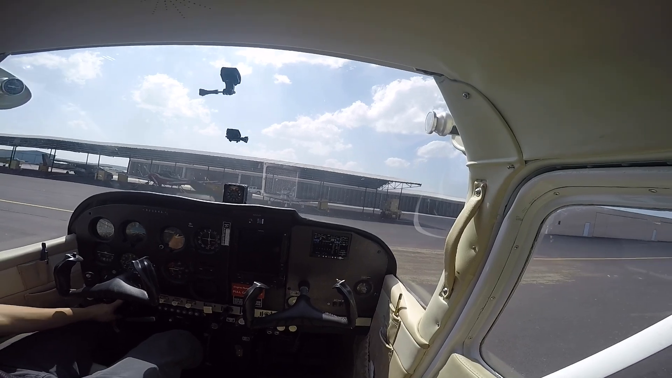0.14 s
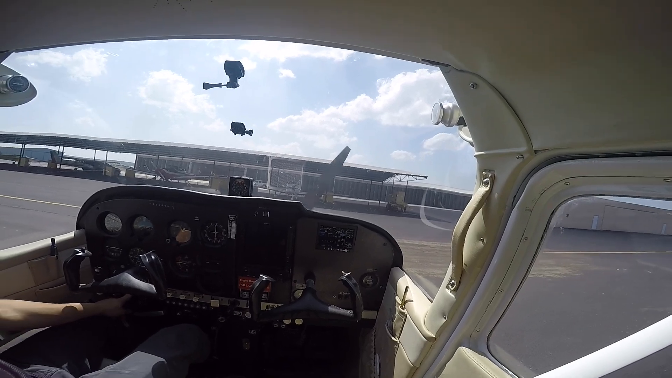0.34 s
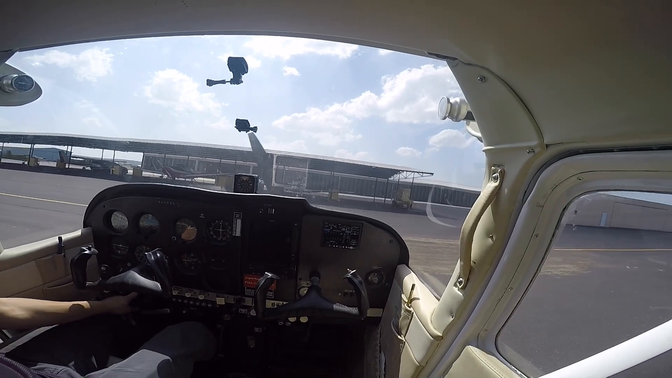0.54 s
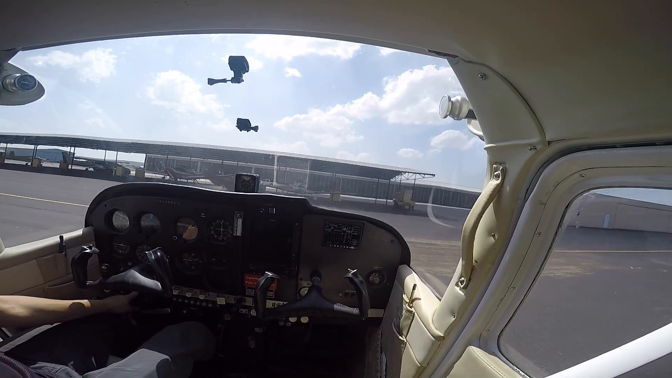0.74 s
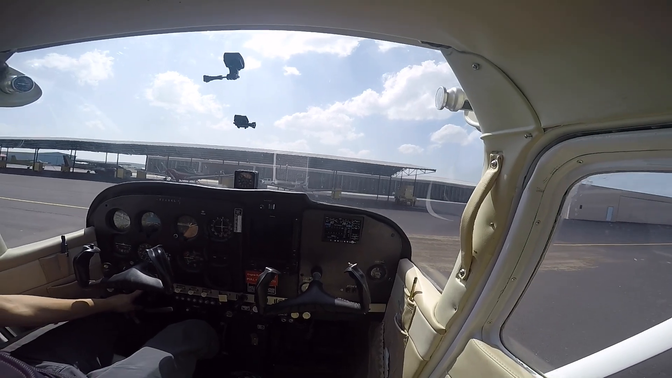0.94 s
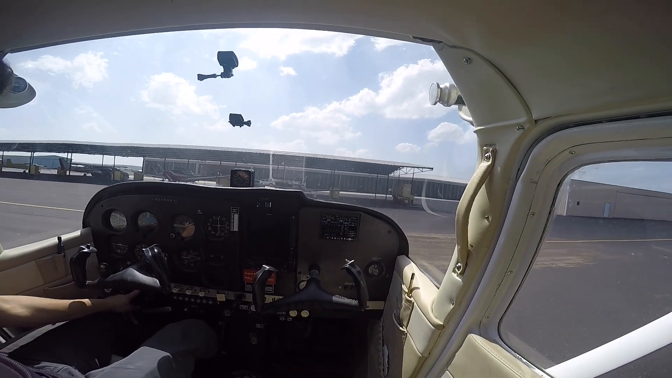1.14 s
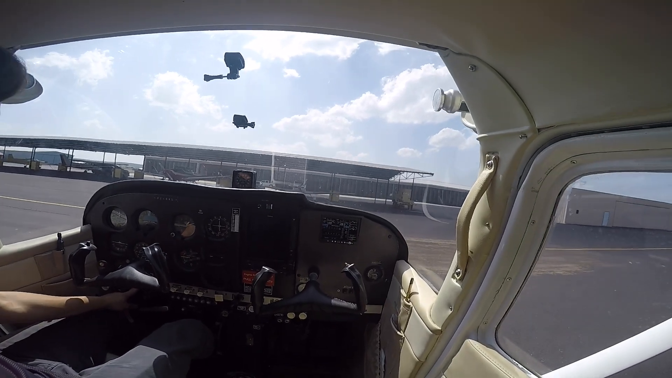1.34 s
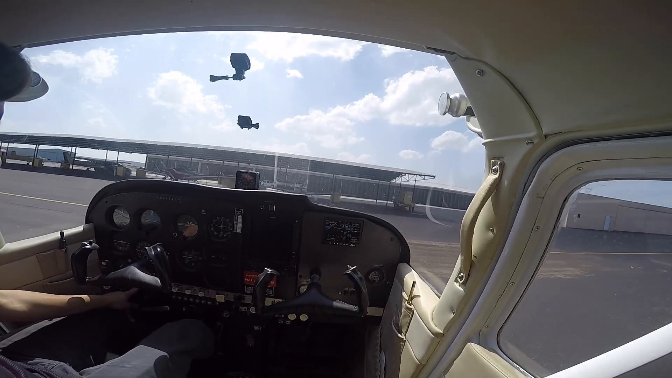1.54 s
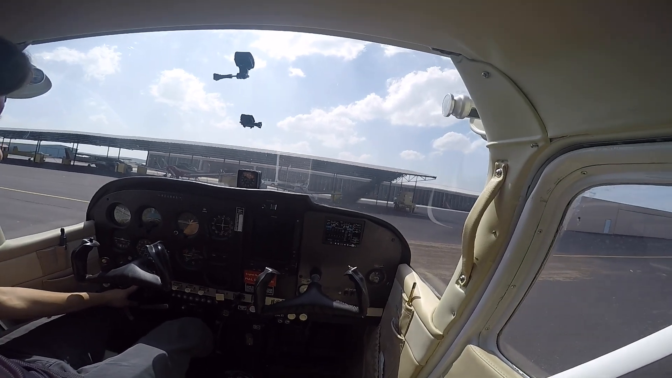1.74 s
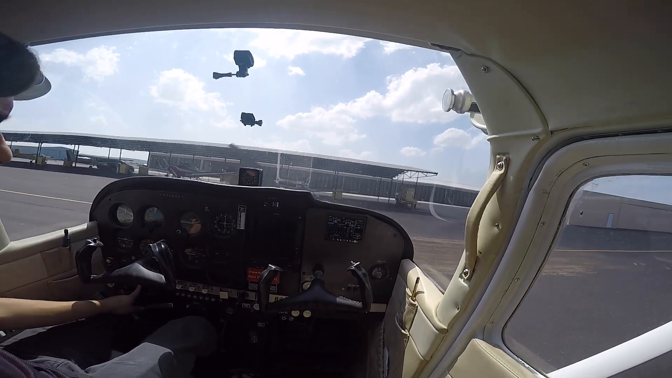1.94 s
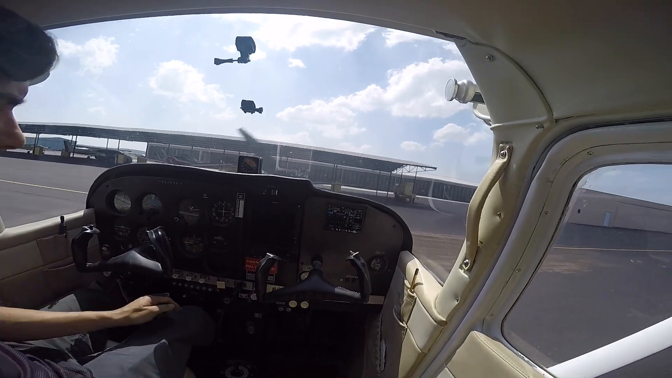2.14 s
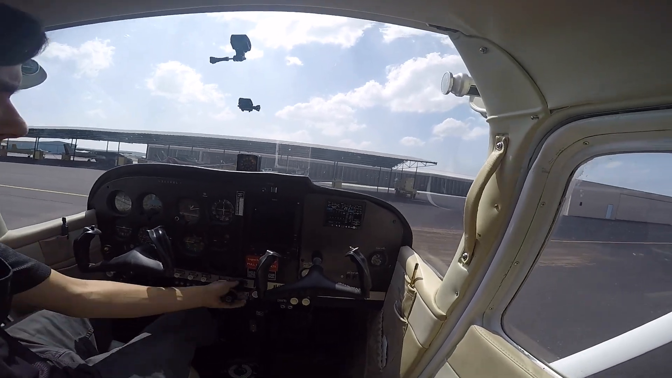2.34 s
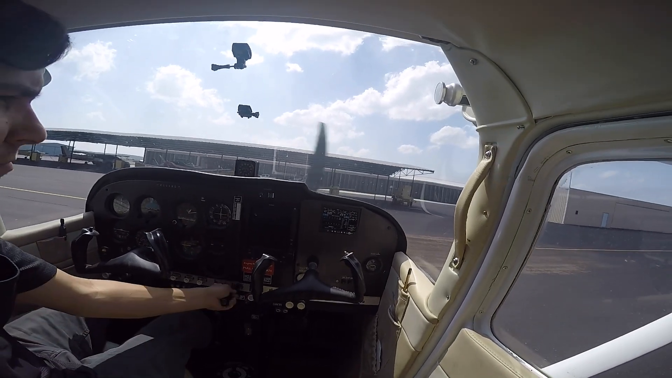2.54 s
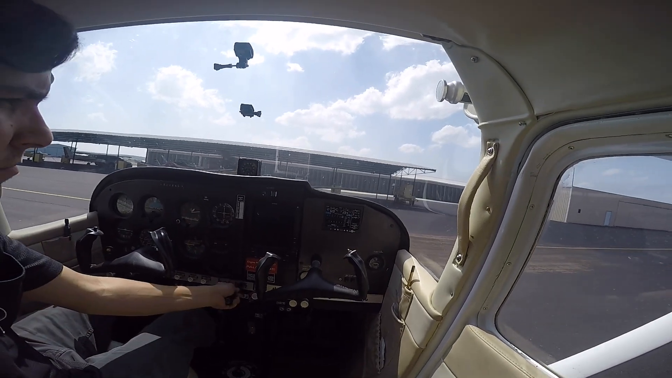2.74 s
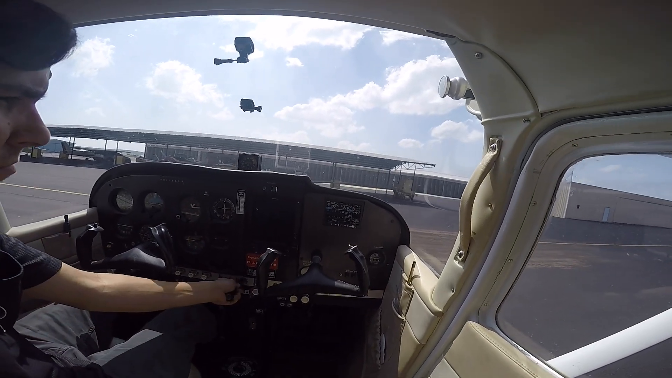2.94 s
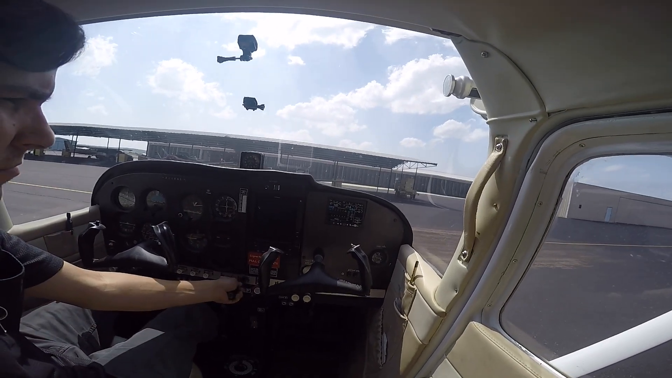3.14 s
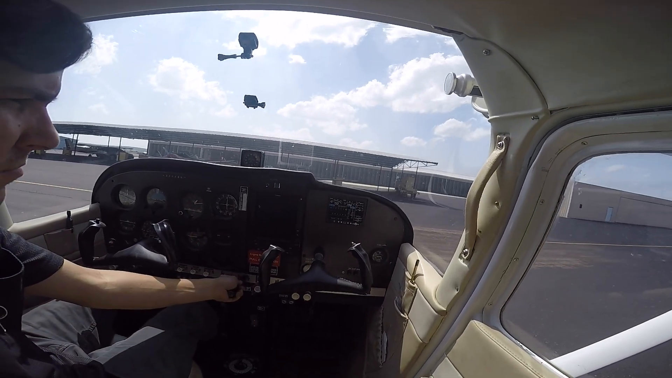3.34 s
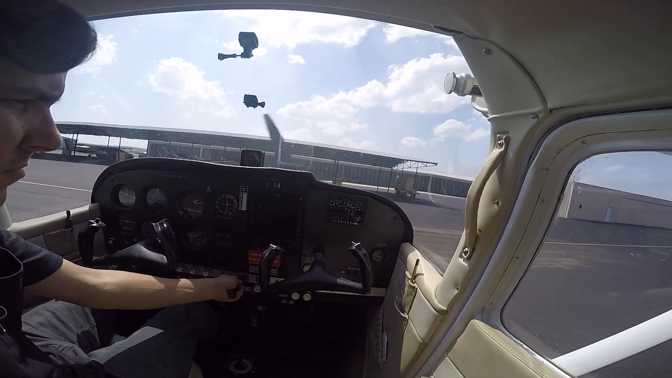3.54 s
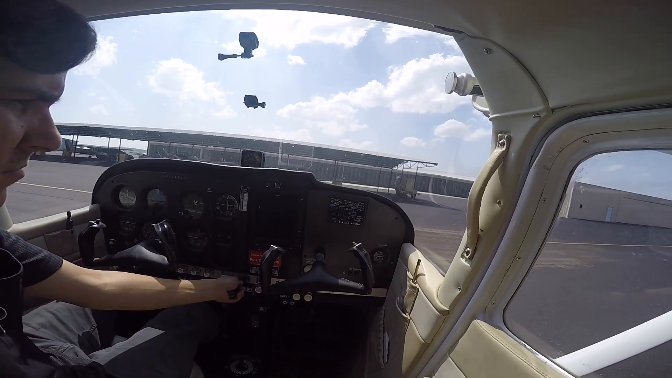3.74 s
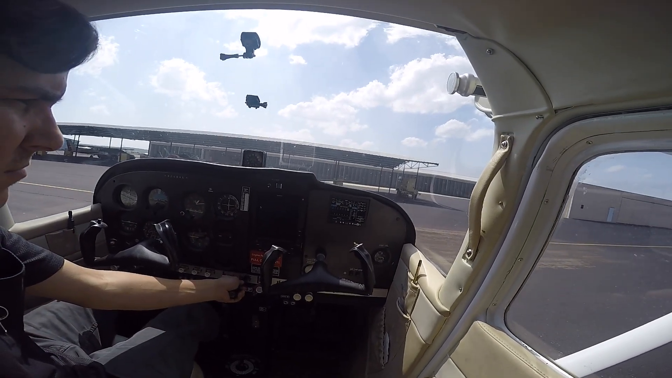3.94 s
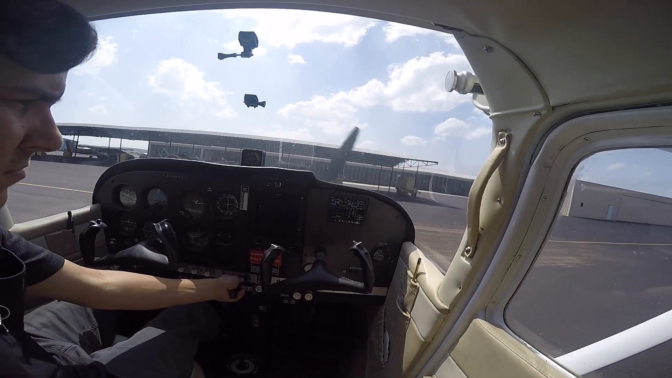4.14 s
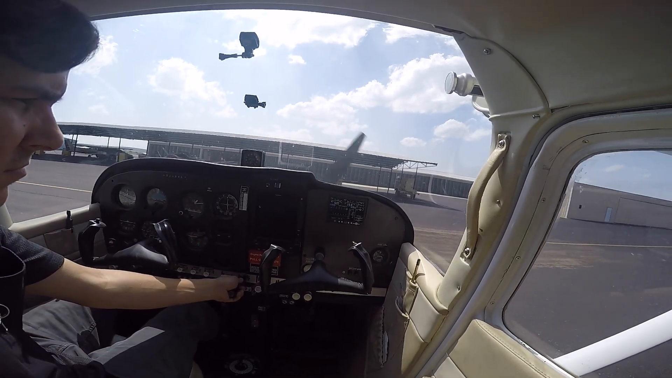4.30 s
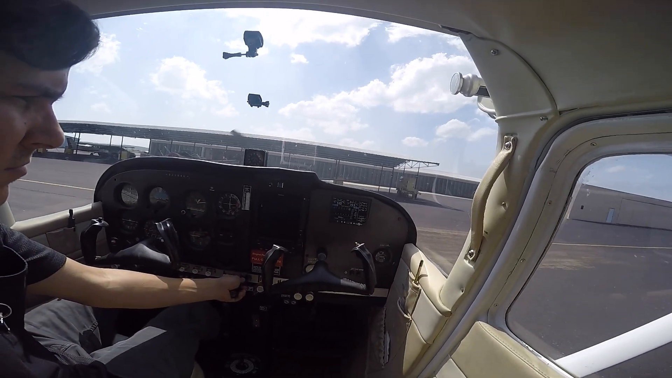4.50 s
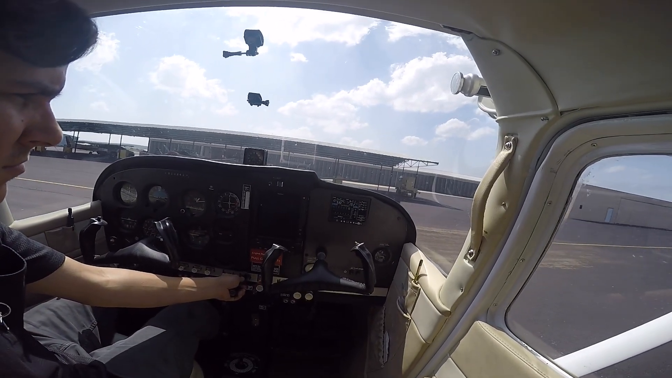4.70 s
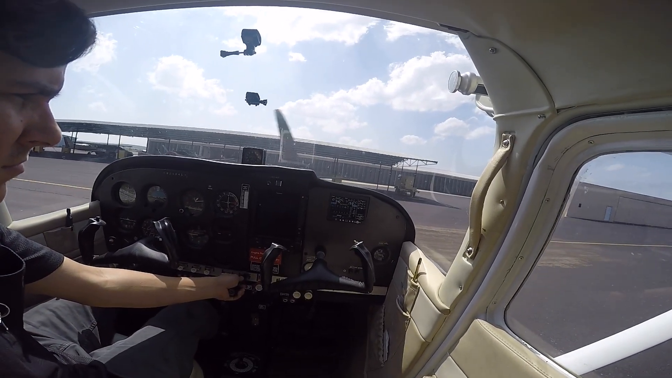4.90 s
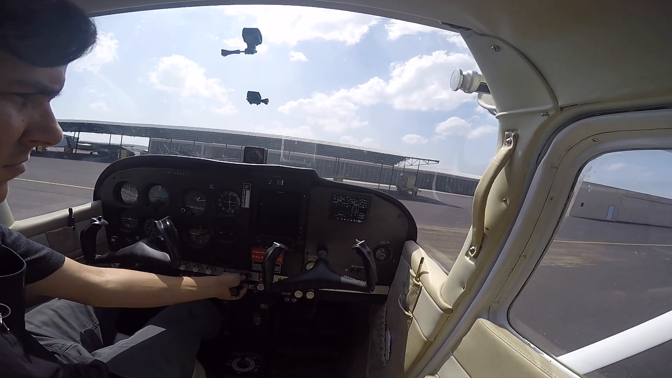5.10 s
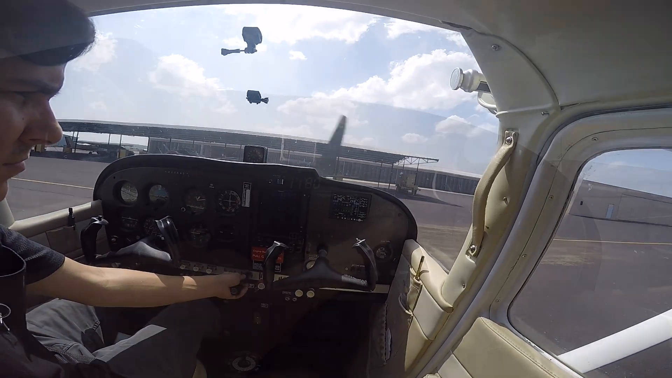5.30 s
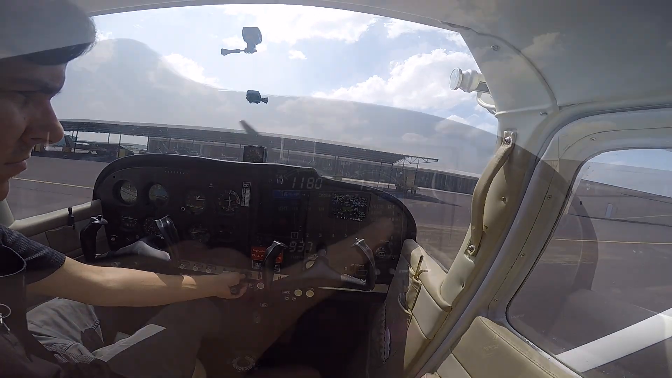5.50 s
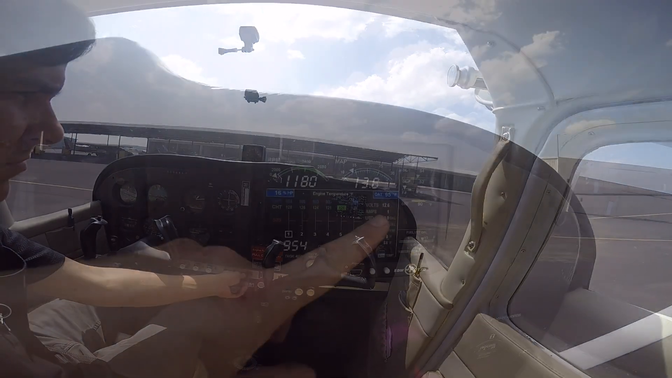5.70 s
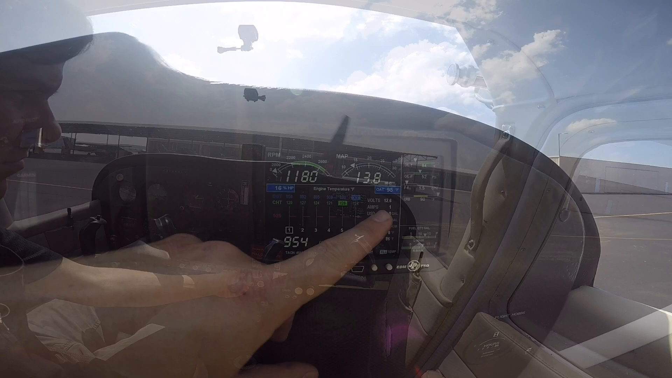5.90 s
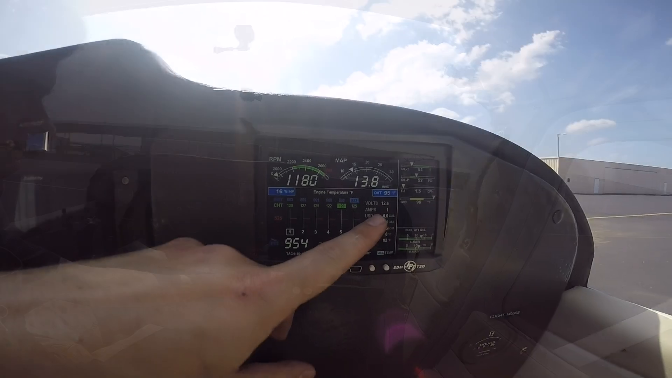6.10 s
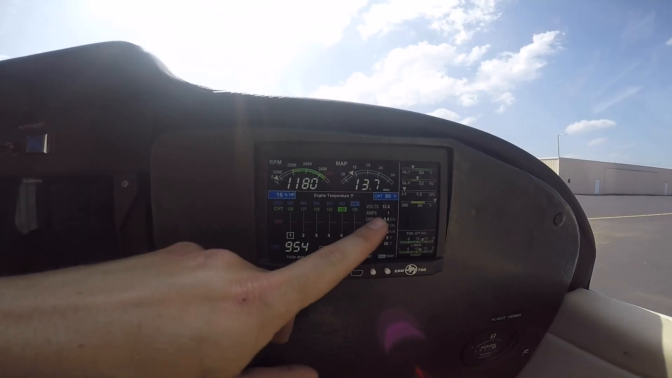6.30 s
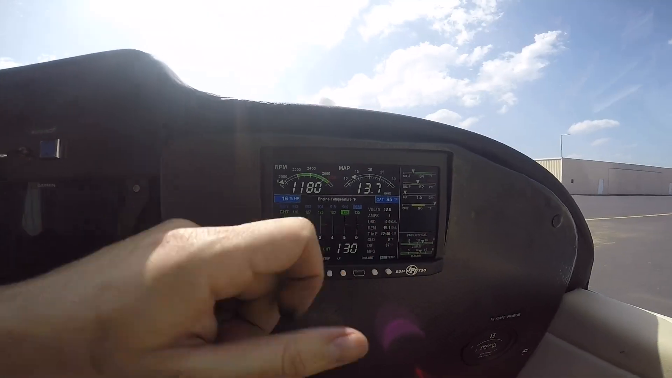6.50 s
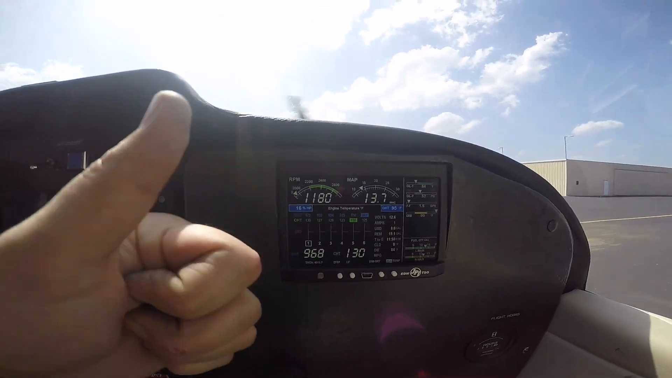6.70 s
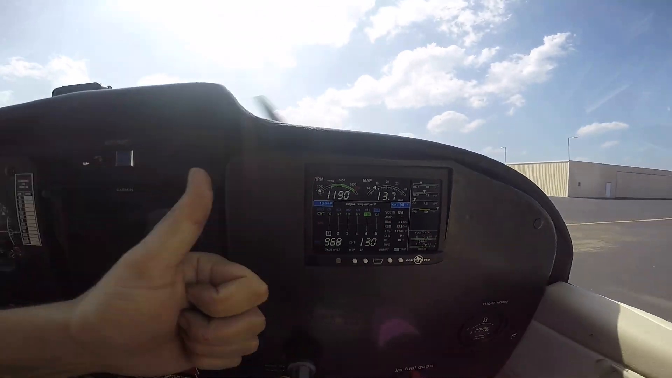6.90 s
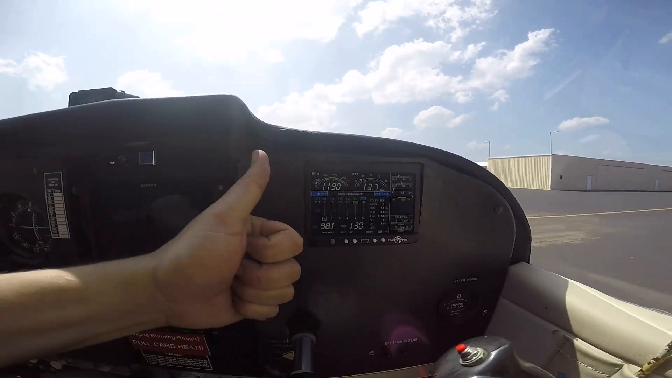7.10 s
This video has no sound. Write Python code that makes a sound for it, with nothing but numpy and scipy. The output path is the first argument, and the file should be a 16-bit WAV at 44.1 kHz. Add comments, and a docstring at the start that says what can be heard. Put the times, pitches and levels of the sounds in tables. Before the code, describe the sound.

Inside a light aircraft cabin, a starter grinds, the piston engine fires and idles roughly with buzzing trim, then blends into a steadier drone.

```python
"""Light aircraft engine start, in the cockpit.

The starter grinds a four-cylinder engine through seven full compression strokes. The engine catches,
flares and sinks to a slow idle that booms in the cabin, knocks on its mount and rattles loose trim.
This crossfades into a faster, smoother idle heard close to the instrument panel."""
import sys
import numpy as np
from scipy import signal
from scipy.fft import rfft, irfft, next_fast_len
from scipy.io import wavfile
from scipy.ndimage import uniform_filter1d, map_coordinates

SR = 44100
rng = np.random.default_rng(int(sys.argv[2]) if len(sys.argv) > 2 else 0)


def dump_mix(stems):
    """Bounce the given channels to the path in sys.argv[1] as a 16-bit WAV at rate SR."""
    frames = np.atleast_2d(stems).T  # one column per channel
    limited = np.clip(frames, -1, 1)  # hard clip at full scale
    pcm = np.round(limited * 32767).astype(np.int16)
    wavfile.write(sys.argv[1], SR, pcm)


N = 319801
T = np.arange(N) / SR

CRANK_SPEED = [(1.6, 13.38), (1.98, 15.54), (2.15, 20.67), (2.69, 21.59), (2.9, 17.65), (3.34, 13.04),
               (3.69, 13.22), (3.87, 11.9), (4.09, 13.5), (5.24, 13.39), (5.35, 13.79)]  # from the catch on: t/s, speed/Hz
COMPRESSIONS = [(0.196, -32.5, -34), (.369, -21, -21), (0.572, -18, -21.5), (0.737, -20.5, -25),
                (.888, -19, -21.5), (1.027, -21.5, -21), (1.166, -21, -21), (1.346, -28.5, -35.5),
                (1.435, -19, -22.5)]  # starter load peaks: t/s, growl/dB, clatter/dB
FIRST_FIRINGS = [(1.603, -31.5, -27), (1.675, -24.5, -26), (1.747, -23, -20.5), (1.804, -20.5, -30),
                 (1.845, -30, -23), (1.884, -31, -25.5)]  # t/s, rattle/dB, bark/dB
STRAY_KNOCKS = [(2.631, -29.5), (3.196, -33.5), (5.114, -31.5)]  # engine on its mount: t/s, level/dB
TRIM_THROWS = [(3.14, -24, 7530), (3.3538, -22.5, 6060), (3.4335, -22.5, 6070), (3.5084, -25.5, 4200),
               (3.5823, -21, 5230), (3.6586, -23, 3370), (3.734, -25, 6240), (3.812, -22.5, 5460),
               (3.899, -24.5, 6500), (3.9804, -32, 6510), (4.055, -23.5, 5320), (4.134, -19, 5340),
               (4.208, -27.5, 5950), (4.2805, -22, 6500), (4.3557, -22.5, 3740), (4.503, -22, 6370),
               (4.5765, -22.5, 7820), (4.7225, -22.5, 6800), (4.8025, -24, 7570), (4.8753, -22.5, 6400),
               (4.9501, -22.5, 5550), (5.026, -27.5, 3780), (5.099, -26.5, 3940), (5.1726, -22.5, 6510),
               (5.247, -29, 6800), (5.3612, -26, 4850), (5.433, -26.5, 3740), (5.4682, -25, 3740),
               (5.5418, -28, 6520), (5.612, -30, 6520), (5.654, -32, 5320), (5.753, -36, 6500),
               (5.828, -33, 5320), (5.975, -34, 6500)]  # about one a turn: t/s, level/dB, ringing part f/Hz
COCKPIT_CLICKS = [(.039, -35), (.113, -24), (1.573, -32), (1.606, -23), (2.7825, -16.5), (6.943, -28)]  # key, switches, trim: t/s, level/dB
CLIP_MODES_HZ = [3300, 3650, 3730, 4380, 5320, 5540, 6500, 7410, 8530]  # loose clips and brackets: f/Hz

# Fast idle tones: crank order, level/dB
SHAFT_ORDERS = [(2, -1), (3, 5.5), (4, -8), (5, -13), (6, -5.5), (10, -18), (12, -19), (13.5, -21)]
CAM_GEAR_ORDERS = [(1.5, -7), (27, -14.5), (28.5, -17.5), (31, -22), (39.5, -15), (41.5, -16),
                   (43.5, -13.5), (55, -23), (67, -17.5), (68, -21)]

# Resonances: f/Hz, width/Hz, level/dB
STARTER_MOUNT_MODES = [(200, 80, 0), (440, 130, -6), (780, 85, 4), (903, 130, -2)]
PINION_MODES = [(920, 105, 2.5), (1120, 95, 2.5), (1380, 150, -7.5), (1815, 230, -7.5), (2440, 360, -15)]
ENGINE_MOUNT_MODES = [(817, 61, 5), (1105, 77, 3.5)]
FIREWALL_PANEL_MODES = [(566, 70, 1), (830, 90, 0.5)]

# Spectra: f/Hz, level/dB
BOOM_SPECTRUM = [(13, -40), (25, -5.5), (42, -1.5), (55, 3.5), (68, -2), (85, -13), (110, -12), (135, -19),
                 (170, -60)]
HISS_SPECTRUM = [(1400, 2), (2500, -4.5), (3800, -6.5), (4900, -5.5), (5750, -12), (7300, -5.5),
                 (8300, -7.5), (9800, -18), (15500, -22.5)]
JOLT_SPECTRUM = [(700, -4.5), (1900, 0.5), (3500, -3), (7800, 1.5), (9500, -4), (15500, -8.5)]
BARK_SPECTRUM = [(150, 0), (800, 3), (1900, -8), (3000, -9), (7000, -37)]
VALVE_GEAR_SPECTRUM = [(90, -2.5), (200, -7), (450, -8), (700, -11), (790, 3), (885, -7.5), (1080, -7),
                       (1350, -13), (1900, -15), (2300, -23), (4000, -26.5), (6600, -56)]
FIREWALL_SPECTRUM = [(80, -20), (140, -1.5), (240, -6.5), (360, -6.5), (450, -11.5), (670, -8.5),
                     (845, -1.5), (1020, -10), (1310, -9), (1450, -15), (2200, -25), (9000, -69)]
TRIM_SPECTRUM = [(1300, -24), (2400, 0.5), (3500, 2.5), (6400, 6), (10500, 3.5), (15500, -4)]
AIR_SPECTRUM = [(2200, -1.5), (3900, -6.5), (8000, -5.5), (9000, -10.5), (15500, -18)]
ROCKING_SPECTRUM = [(8, -17), (14, 3), (28, 2.5), (58, -9.5), (85, -20.5), (200, -29.5), (400, -74)]

KEY_S, CATCH_S, THROTTLE_BACK_S = 0.036, 1.53, 2.68


def starter():
    """Each compression loads the gears: tooth clatter, a growl in the mount, a lingering hiss."""
    mesh_hz, backlash_s, full_load_db = 280, 0.057, -21
    tooth_count = np.floor(np.cumsum(mesh_hz * (1 + 0.08 * wobble(70))) / SR)
    teeth = np.diff(tooth_count, prepend=0)
    hammering = lambda rough: unit(teeth * amp(noise())) + rough * noise()
    growl = muffled(ring(hammering(rough=1.6), STARTER_MOUNT_MODES), corner_hz=4100)
    clatter = muffled(ring(hammering(rough=0.35), PINION_MODES), corner_hz=5000)
    load, bite, puffs, chug = np.zeros((4, N))
    for onset_s, growl_db, clatter_db in COMPRESSIONS:
        age_s = T - onset_s
        rebound = amp(-11) * swell(age_s - backlash_s, 0.013, 0.47)
        load += amp(growl_db) * (swell(age_s, 0.021, 3.1) + rebound)
        bite += amp(clatter_db) * swell(age_s, 0.015, 1.28)
        puff_db = -30.5 + 4.1 * min(growl_db - full_load_db, 0)  # weak strokes barely hiss
        puffs += amp(puff_db) * (0.83 * swell(age_s, 0.021, 3.4) + 0.29 * swell(age_s, 0.047, 0.89))
        chug += amp(-19) * thump(onset_s, hz=53.2, rise_s=0.03)
    spin_up = amp(-41) * swell(T - KEY_S, 0.024, 0.46)
    hiss = coloured(jangle(noise(), depth_db=3.1), HISS_SPECTRUM)
    return chug + load * growl + bite * clatter + (puffs + spin_up + amp(-53.5)) * hiss


def starter_groan():
    """Two motor partials, wandering in pitch and level."""
    phase = 2 * np.pi * np.cumsum(110 * (1 + 0.071 * wobble(16))) / SR
    level = amp(-42.5 + 3.5 * wobble(20)) * ramp(0.38, 0.49) * (1 - ramp(1.92, 2.1))
    return level * (np.sin(phase) + np.sin(2 * phase))


def engine_catch():
    """First firings thump, bark and jolt the trim; the overrun pinion cracks and whirrs."""
    jolts, barks, thumps = np.zeros((3, N))
    for onset_s, rattle_db, bark_db in FIRST_FIRINGS:
        jolts += amp(rattle_db) * swell(T - onset_s, 0.01, 0.52)
        barks += amp(bark_db) * swell(T - onset_s, 0.0067, 0.67)
        thumps += amp(-11) * thump(onset_s, hz=41, rise_s=0.016)
    buzz = amp(-45) * ramp(1.63, 1.68) * (1 - ramp(1.8, 2.5))
    overrun = swell(T - 1.75, 0.23, 0.44) * (1 - ramp(2.56, 3.2))
    whirr = amp(-40) * overrun * ring(noise(), [(6800, 650, 0)])
    crack = amp(-10.5) * swell(T - 1.8435, 0.0006, 0.4) * coloured(noise(), JOLT_SPECTRUM)
    rattle = (jolts + buzz) * coloured(jangle(grains(12000), depth_db=5), JOLT_SPECTRUM)
    return rattle + barks * coloured(grains(1500), BARK_SPECTRUM) + thumps + whirr + crack


def slow_idle(crank_hz, turns):
    """Two unequal firings a turn boom in the cabin; valve gear clatters in step, from cranking on."""
    orders = np.zeros(N)
    for k in range(1, 13):
        scatter = 0.4 if k == 4 else 1  # burns vary; order 4, on the cabin resonance, is steadier
        lag_rad = 0.33 * scatter * wobble(6)
        waver_db = 2 * scatter * wobble(8)
        order_db = along(BOOM_SPECTRUM, k * crank_hz) - 7 * (k % 2) + waver_db
        orders += amp(order_db) * np.cos(2 * np.pi * k * (turns - 0.112) + lag_rad)
    running = ramp(1.55, 1.62)
    boom = unit(orders) * amp(-16 + 4 * flare() - 3.2 * surge()) * running
    beat = amp(2 * np.cos(2 * np.pi * (turns - 0.185)) + wobble(25.65))
    cranking = (1 - running) * ramp(KEY_S, 0.15)
    valve_level = cranking * amp(-39) + running * amp(-33.5 + 8 * surge())
    return boom + valve_level * coloured(grains(4000) * beat, VALVE_GEAR_SPECTRUM)


def fast_idle(crank_hz=19.75):
    """Shaft, cam and gear tones; valve and exhaust clatter that partly repeats every two turns."""
    turns = np.cumsum(crank_hz * (1 + 0.00178 * wobble(4))) / SR
    tones = sum(amp(db + 0.81 * wobble(5.7)) * np.cos(2 * np.pi * (k * turns + rng.random()))
                for k, db in SHAFT_ORDERS + CAM_GEAR_ORDERS)
    cycle = unit(irfft(np.exp(2j * np.pi * rng.random(round(SR / crank_hz)))))  # equal half orders
    clatter = cycle[(turns / 2 % 1 * len(cycle)).astype(int)] + grains(3000)
    body = amp(-24.5) * coloured(clatter, FIREWALL_SPECTRUM)
    ringing = amp(-35.5) * muffled(ring(clatter, FIREWALL_PANEL_MODES), corner_hz=3500)
    pulsed_noise = noise() * amp(np.cos(4 * np.pi * turns) + 1.2 * wobble(20))
    air = amp(-41) * coloured(pulsed_noise, AIR_SPECTRUM)
    return amp(-13.5) * unit(tones) + body + ringing + air


def mount_knocks(crank_hz, turns, sway_turns=3):
    """The shuddering engine hits its mount once a sway, plus a few stray hard knocks."""
    knock = lambda age_s: swell(age_s, 0.008, 0.4)
    sway_age_s = (turns - 1.89) % sway_turns / crank_hz
    regular = amp(-35.5) * shudder(crank_hz) * knock(sway_age_s)
    stray = sum(amp(db) * knock(T - onset_s) for onset_s, db in STRAY_KNOCKS)
    return (regular + stray) * muffled(ring(noise(), ENGINE_MOUNT_MODES), corner_hz=3500)


def trim_buzz(crank_hz, turns):
    """Loose panels buzz with the firings; the shudder keeps metal clips ringing."""
    phase = 2 * np.pi * (turns - 0.177)
    fast = np.clip(crank_hz / 21, 0, 1) ** 4  # at speed, one pulse a turn instead of two
    pulse_db = 2.84 * (1 - fast) * np.cos(2 * phase) + 2.4 * fast * np.cos(phase)
    shake = shudder(crank_hz)
    drives = amp(-47), amp(-36) * flare(), amp(-26.5) * surge(), amp(-39.3) * shake
    level = np.sqrt(sum(drive ** 2 for drive in drives)) * amp(pulse_db) * ramp(1.84, 1.906)
    clips = ring(noise(), [(hz, 50, 0) for hz in CLIP_MODES_HZ])
    panels = coloured(jangle(grains(14000), depth_db=3), TRIM_SPECTRUM)
    return level * unit(panels + 0.3 * shake * clips)


def trim_throws(linewidth_hz=50):
    """The stronger firing of a turn throws the trim: it chatters, one part rings, the rest tinkle."""
    contacts = coloured(jangle(grains(5000), depth_db=4), TRIM_SPECTRUM)
    age_s, out = T[:SR // 10], np.zeros(N)
    for onset_s, db, ring_hz in TRIM_THROWS:
        span = round(onset_s * SR) + np.arange(len(age_s))
        chatter = amp(-9.6) * swell(age_s, 0.004, 0.36) * contacts[span]
        part_hz = np.append(CLIP_MODES_HZ, ring_hz)[:, None]
        part_db = np.append(rng.normal(-23, 4, len(CLIP_MODES_HZ)), -12)
        walk = np.cumsum(rng.standard_normal((len(part_hz), len(age_s))), axis=1)
        drift_rad = walk * np.sqrt(2 * np.pi * linewidth_hz / SR)
        ringing = amp(part_db) @ np.sin(2 * np.pi * part_hz * age_s + drift_rad)
        out[span] += amp(db) * (chatter + swell(age_s, 0.003, 0.26) * ringing)
    return out


def clicks():
    """Small hard contacts, close by."""
    blows = sum(amp(db) * swell(T - onset_s, 0.00038, 0.67) for onset_s, db in COCKPIT_CLICKS)
    return cabin_echo(blows * coloured(noise(), TRIM_SPECTRUM), t60_s=0.08, wet_db=-5)


def airframe(blend):
    """The aircraft rocks on its undercarriage, most at the starter's kick and the catch."""
    start_db = -19 + 4 * swell(T - KEY_S, 0.14, 5.2) + 7.5 * surge()
    level_db = (1 - blend) * start_db - 31 * blend
    return coloured(noise(), ROCKING_SPECTRUM) * ramp(0, 0.14) * amp(level_db)


def flare():
    """Extra engine effort from catch to throttle-back, 0 to 1."""
    return ramp(CATCH_S, CATCH_S + 1) * (1 - ramp(THROTTLE_BACK_S, THROTTLE_BACK_S + 0.21))


def surge():
    """Single heave of the aircraft at the catch, 0 to 1."""
    return swell(T - CATCH_S, 0.2, 1.55)


def shudder(crank_hz, threshold_hz=14.4):
    """Shake of the throttled engine, 0 to 1; rises steeply as it slows past the threshold."""
    return (T > THROTTLE_BACK_S) / (1 + (crank_hz / threshold_hz) ** 20.6)


def thump(onset_s, hz, rise_s):
    """Cabin air, pushed once, swings briefly."""
    return swell(T - onset_s, rise_s, 0.97) * np.sin(2 * np.pi * hz * (T - onset_s))


def jangle(x, depth_db):
    """Contact points shift, so ringing bands change from blow to blow; the top stays smooth."""
    hz, _, bands = signal.stft(x, SR, nperseg=512)
    patches = rng.standard_normal(bands.shape)
    for size, axis in (2, 0), (9, 1), (4, 1):  # smooth over frequency, then twice over time
        patches = uniform_filter1d(patches, size=size, axis=axis)
    band_depth_db = depth_db / (1 + (hz[:, None] / 9000) ** 4)
    return signal.istft(bands * amp(band_depth_db * unit(patches)), nperseg=512)[1][:N]


def muffled(x, corner_hz):
    """Treble loss through the firewall, rms 1."""
    return unit(filtered(x, lambda hz: 1 / (1 + 1j * hz / corner_hz) ** 3))


def cabin_echo(x, t60_s, wet_db):
    """Dense, short reflections off windows and panels."""
    age_s = T[:SR // 3]
    tail = rng.standard_normal(len(age_s)) * amp(-60 * age_s / t60_s)
    wet = signal.fftconvolve(x, tail / np.linalg.norm(tail))[:N]
    return (x + amp(wet_db) * wet) / np.hypot(1, amp(wet_db))


def amp(db):
    """dB to gain."""
    return 10 ** (np.asarray(db) / 20)


def unit(x):
    """Scale to rms 1."""
    return x / np.sqrt(np.mean(x ** 2) + 1e-20)


def along(spectrum, hz):
    """Level/dB at hz, interpolated on a log axis."""
    knot_hz, db = np.transpose(spectrum)
    return np.interp(np.log(hz + 1), np.log(knot_hz + 1), db)


def ramp(start_s, end_s):
    """Smooth step, 0 to 1."""
    return np.sin(np.pi / 2 * np.clip((T - start_s) / (end_s - start_s), 0, 1)) ** 2


def swell(age_s, rise_s, shape):
    """Burst peaking at 1 after rise_s; higher shape, shorter burst."""
    u = np.maximum(age_s, 0) / rise_s
    return (u * np.exp(1 - u)) ** shape


def wobble(rate_hz):
    """Smooth random curve, knots at rate_hz."""
    grid_s = np.linspace(0, T[-1], int(10 * rate_hz * T[-1]))
    knots = rng.standard_normal(int(N * rate_hz / SR) + 4)
    return np.interp(T, grid_s, map_coordinates(knots, [grid_s * rate_hz]))


def noise():
    """White noise."""
    return rng.standard_normal(N)


def grains(rate_hz):
    """Tiny random contacts, rms 1."""
    return unit(noise() * (rng.random(N) < rate_hz / SR))


def filtered(x, response):
    """Apply a frequency response."""
    size = next_fast_len(N + SR // 2)
    return irfft(rfft(x, size) * response(np.fft.rfftfreq(size, 1 / SR)), size)[:N]


def coloured(x, spectrum):
    """Shape by a spectrum, rms 1."""
    return unit(filtered(x, lambda hz: amp(along(spectrum, hz))))


def ring(x, modes):
    """Parallel resonances of alternating sign, rms 1."""
    def response(hz):
        return sum((-1) ** k * amp(db) * 1j * hz * width_hz / (mode_hz**2 - hz**2 + 1j * hz * width_hz)
                   for k, (mode_hz, width_hz, db) in enumerate(modes))
    return unit(filtered(x, response))


def scene():
    """Start and slow idle, crossfaded into the fast idle."""
    crank_hz = np.interp(T, *np.transpose(CRANK_SPEED))
    turns = np.cumsum(crank_hz) / SR
    turns -= np.interp(1.598, T, turns)  # zero at the first firing
    blend = ramp(5.054, 6.41)
    start = starter() + starter_groan() + engine_catch()
    start += slow_idle(crank_hz, turns) + mount_knocks(crank_hz, turns)
    rattle = (1 - ramp(5.3, 6.45)) * trim_buzz(crank_hz, turns) + trim_throws()
    return ((1 - blend) * start + rattle + blend * fast_idle() + airframe(blend) + clicks())[None]


def record(dry):
    """Soft peak limit, then band limit."""
    ceiling, top_hz = 0.92, 15500
    rounded = dry[0] / (1 + np.abs(dry[0] / ceiling) ** 10) ** (1 / 10)
    return filtered(rounded, lambda hz: hz < top_hz)[None]


dry = scene()
out = record(dry)
dump_mix(out)
```